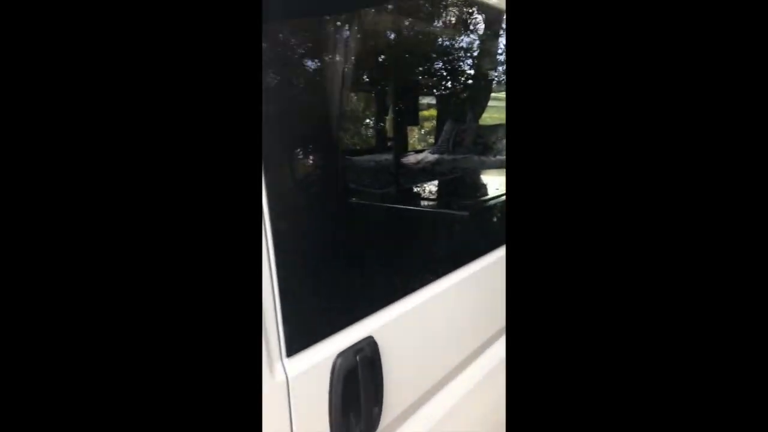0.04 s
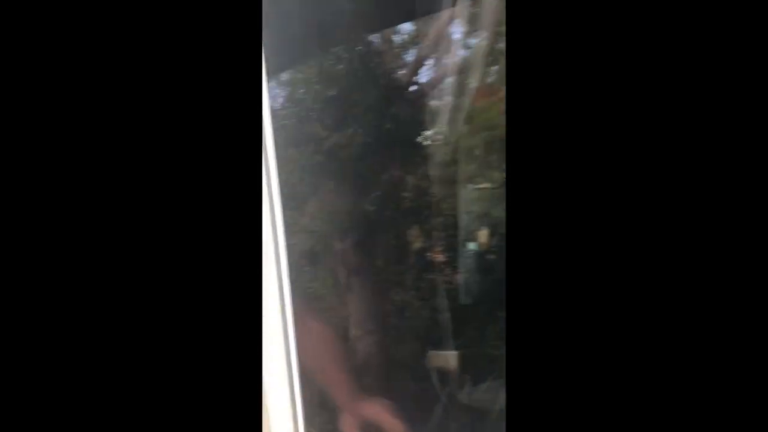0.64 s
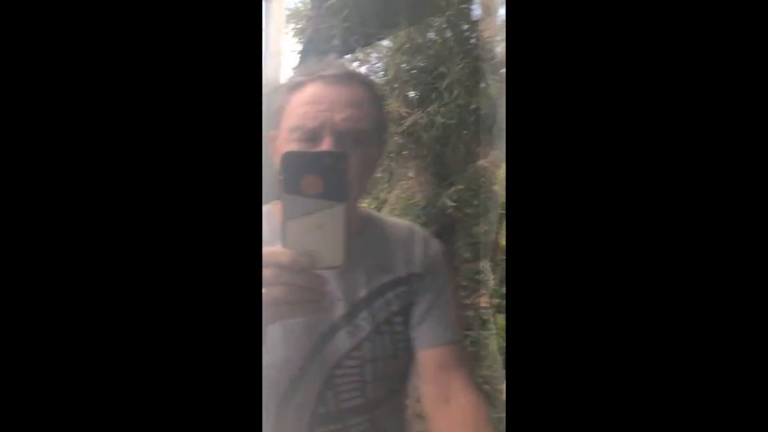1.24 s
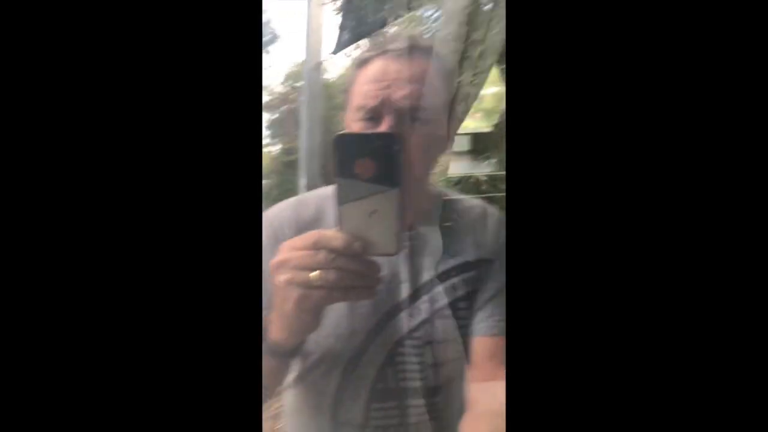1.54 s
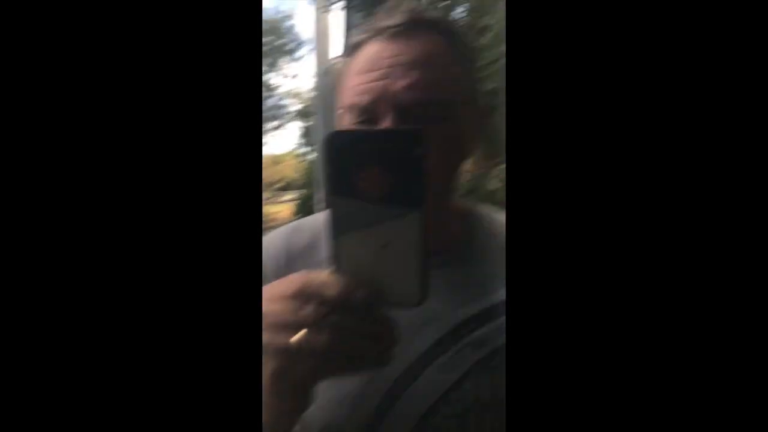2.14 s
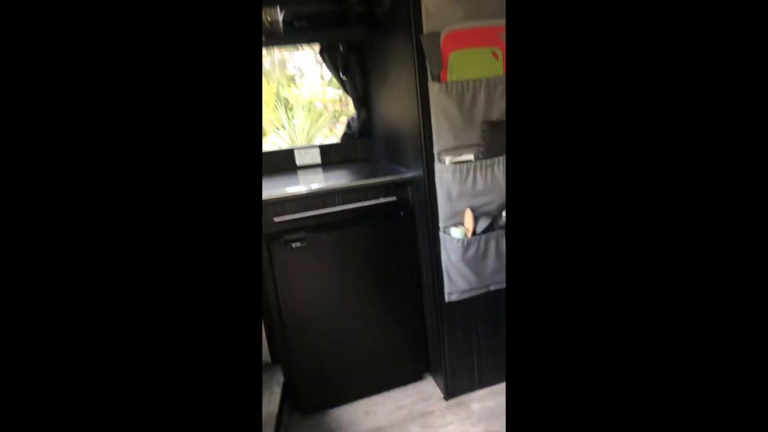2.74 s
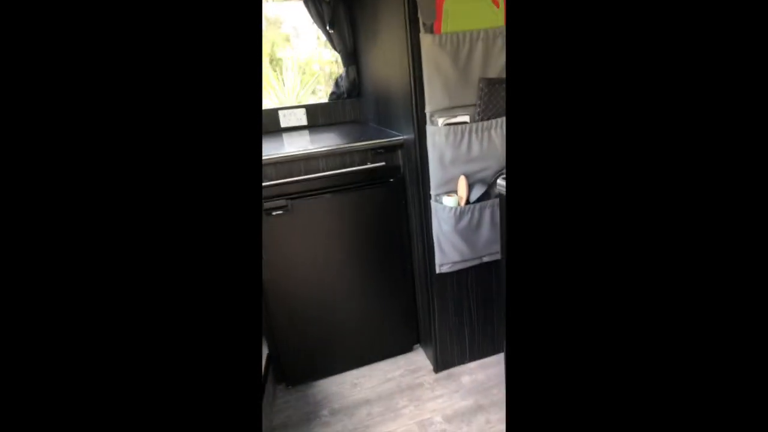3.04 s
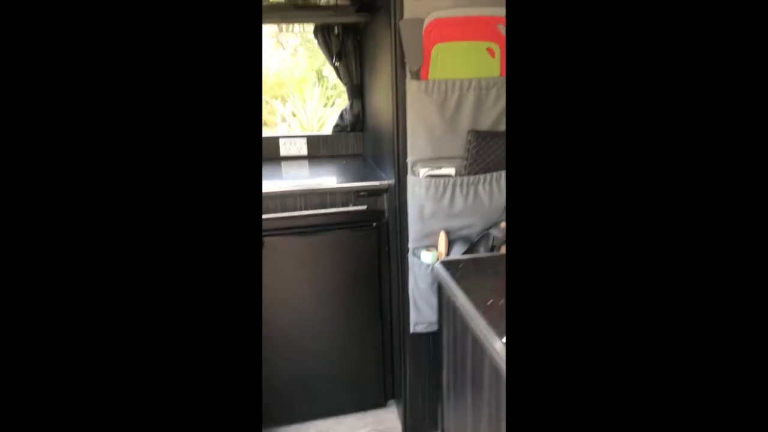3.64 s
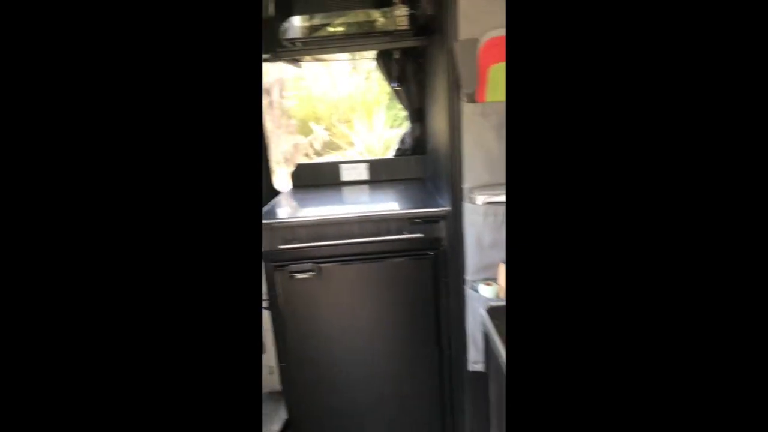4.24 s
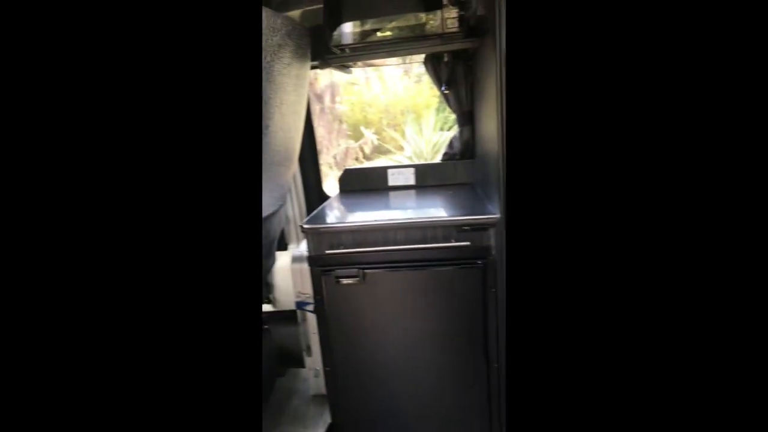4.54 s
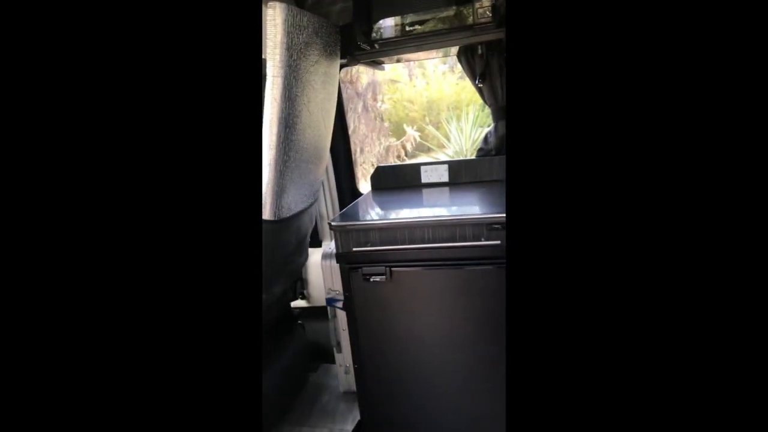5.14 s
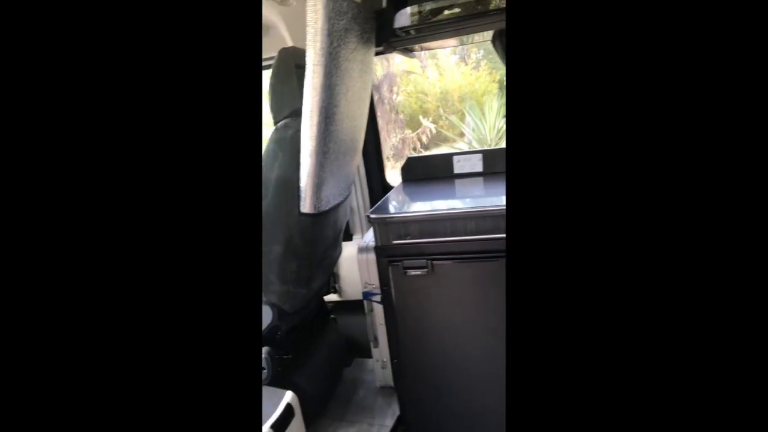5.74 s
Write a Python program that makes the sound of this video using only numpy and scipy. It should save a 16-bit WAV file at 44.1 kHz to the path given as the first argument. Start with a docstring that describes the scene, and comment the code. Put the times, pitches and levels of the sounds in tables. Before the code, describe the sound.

Heard close up on a phone outdoors, a sleeve swishes and a van's handle scrapes and clicks before the side door pops free with a deep metal thud. After a short creak it rolls open, humming and crackling over grit, with one knock along the way. It stops with a clunk and a thin steel ring, followed by a soft footstep. Faint birds and a light breeze lie behind.

```python
"""A van's sliding side door is opened from outside, an arm's length from a phone.
First, clothes rustle and far birds call in quiet outdoor air. A hand pulls the handle, the latch lets
go and the door's outer skin booms (1.6 s). The door creaks out of its frame, rumbles along its rail
and knocks over a joint (3.6 s). It clunks into the end catch (4.9 s), whose steel rings on.
Last, a foot lands on the hollow step (5.6 s)."""
import sys
import numpy as np
from scipy import signal
from scipy.fft import rfft, irfft
from scipy.io import wavfile
from scipy.ndimage import uniform_filter1d

SR = 44100
rng = np.random.default_rng(int(sys.argv[2]) if len(sys.argv) > 2 else 0)


def store_pcm(level_fs):
    """Save levels as 16-bit WAV."""
    pcm = np.round(np.clip(level_fs, -1, 1) * 32767).astype(np.int16)
    wavfile.write(sys.argv[1], SR, np.atleast_2d(pcm).T)


N = 264858
TIME = np.arange(N) / SR
RING_TIME = TIME[:SR]  # one second for each hit to die away
SLAM_S = 4.905  # the door hits the end catch

# The roller arm sticks and slips as the door swings out, then snaps over chips on the rail.
# Each row: start in seconds, level in dB.
ARM_JOLTS = [(1.9068, -16), (1.931, -21), (1.951, -21), (1.968, -25), (1.989, -22.5), (2.0153, -21.5),
             (2.0368, -22), (2.0602, -24), (2.078, -26), (2.091, -28), (2.111, -30), (2.128, -27),
             (2.586, -32), (2.6034, -22.5), (2.821, -24.5)]
# The door gets two shoves, then coasts. Each row: time in seconds, share of top speed.
DOOR_SPEED = [(1.848, 0.14), (2.0, 0.16), (2.2, 0.49), (2.4, 0.4), (2.56, 0.72), (2.85, 0.74), (3.13, 1),
              (3.45, 0.46), (3.97, 0.39), (4.12, 0.14), (4.9, 0.19)]
# The broad tone of rolling on the rail. Each row: frequency in Hz, relative level in dB.
RAIL_TONE = [(30, -11), (60, -5), (95, -3), (140, 3), (250, -4.5), (500, -8), (750, -13), (1000, -11),
             (1500, -19), (2100, -26.5), (3700, -34.5), (5000, -38.5), (9000, -47), (16000, -30.5)]
# How loud the grit is: dB at top speed, dB per tenfold speed, dB per second as the door moves away.
GRIT_LOUDNESS = (-28.5, 21.4, -5)


def door_blows():
    """Metal meets metal at the latch, rail joint and end stop: each crack rings the steel shell."""
    # Each row: start in seconds, then thud, knock, clack and tick (low to high) in dB,
    # then ring time in seconds.
    hits = [(1.6084, -17, -20.5, -26, -51, 0.045), (1.6189, -18, -15, -22.5, -36.5, 0.13),
            (1.624, -10, -8, -41, -46, 0.042), (1.632, -12.5, -19, -28.5, -38, 0.25),
            (1.644, -31, -45, -43, -24.5, 0.05), (3.579, -60, -21, -38, -45, 0.35),
            (3.586, -8.5, -22, -34.5, -29.5, 0.1), (4.7421, -38, -20.5, -31.5, -46.5, 0.22),
            (4.789, -24, -16, -27, -48, 0.069), (4.797, -46, -17, -34, -56, 0.18),
            (4.9017, -22.5, -9.5, -17.5, -21, 0.24), (4.959, -31, -23, -26.5, -38, 0.19),
            (4.970, -11.5, -8, -54, -60, 0.092)]
    # The notes of the door's shell. Each row: pitch in Hz, relative level in dB, ring time in seconds.
    shell_notes = [(390, -7, .3), (539, 3, .24), (575, -4, .35), (675, -1, .2), (895, 1, .17),
                   (951, 2, .18), (1204, -9, .27), (1614, -9, .25), (1758, -6, .22), (1850, -6, .2),
                   (2453, -6, .23), (3435, -9, .17), (3767, -12, .15), (3853, -12, .15), (5617, -12, .11)]
    out = np.zeros(N)
    for start, thud, knock, clack, tick, ring_s in hits:
        tone = [(60, thud - 9), (180, thud - 1), (500, knock - 4), (2000, clack),
                (8000, tick + 0.5), (16000, tick - 6)]
        add(out, start, burst(tone, ring_s, damping=0.22, rise_cycles=1))
        crack = unit(band(noise(SR), 5500, 10000)) * fade(0.018)
        add(out, start, undb(tick + 2) * crack)
        # The seal shortens the ringing until the door is out of its frame.
        ring_share = 0.16 if start < ARM_JOLTS[0][0] else 1
        # A harder hit brings out the higher notes.
        notes = [(hz, db + np.interp(hz, [700, 3000], [knock, clack + 9]), note_s * ring_share)
                 for hz, db, note_s in shell_notes]
        add(out, start, undb(-15.5) * ring(notes, scatter_db=1.5))
    return out


def joint_ping():
    """The end of the rail pings as the rollers cross the joint."""
    # The rail's notes. Each row: pitch in Hz, relative level in dB, ring time in seconds.
    rail_notes = [(2090, -3, .15), (6385, -14, .2), (6520, -13, .17), (7450, 0, .07)]
    out = np.zeros(N)
    add(out, 3.586, undb(-35) * ring(rail_notes, scatter_db=.5))
    return out


def end_catch():
    """The striker, a steel part, hits the catch: it rings loud and short, the catch soft and long."""
    # The notes of both parts. Each row: pitch in Hz, relative level in dB, ring time in seconds.
    striker_notes = [(3290, -5, .07), (3521, -5, .11), (3682, -3, .09), (3790, -4, .08), (4050, -7, .06),
                     (5380, -4, .07), (6011, -7, .08), (6438, -7, .09)]
    catch_notes = [(3133, -3, 1.3), (3327, -5, 1.1), (3424, -7, 1.), (3628, 3, .8), (4285, -11, .9),
                   (4409, -14, .9), (5184, -11, .7), (5469, -1, .58), (5766, -9, .55), (7445, -8, .4)]
    out = np.zeros(N)
    add(out, SLAM_S, undb(-15.5) * ring(striker_notes, scatter_db=.5))
    add(out, SLAM_S, undb(-42.5) * ring(catch_notes, scatter_db=.5))
    return out


def skin_boom():
    """The door's big outer skin heaves slowly and booms; dents in the rail give it shorter thuds."""
    # The skin's deep notes. Each row: pitch in Hz, relative level in dB, ring time in seconds.
    skin_notes = [(55, 0, 0.27), (77, -2, .2), (93, 2, 0.18), (150, -6, 0.15), (188, -5, .18)]
    # The door springs off its seal, rebounds, and later hits the stop.
    # Each row: start in seconds, level in dB.
    heaves = [(1.633, -8.5), (1.6956, -14.5), (1.732, -20), (4.916, -26)]
    # Rollers drop into the deepest dents. Each row: start in seconds, relative level in dB.
    dents = [(2.154, -21), (2.227, -22), (2.309, -20), (3.151, -21), (3.765, -24), (3.789, -23),
             (3.884, -21)]
    dent_notes = [(130.3, 1.5, 0.14), (172, -3, 0.3), (214, -6, 0.27)]  # rows as in skin_notes
    out = np.zeros(N)
    for start, db in heaves:
        add(out, start, undb(db) * ring(skin_notes, random_sign=False))
    for start, db in dents:
        add(out, start, undb(db + 3) * ring(dent_notes, random_sign=False))
    return band(out, 43.4, 610)


def soft_knocks():
    """Hand, handle and feet make padded knocks: a brief note, a short clatter and a low thud."""
    # Each row: start in seconds, relative knock level in dB, pitch in Hz, thud level in dB,
    # ring time in seconds.
    touches = [(1.247, -30.5, 824, -24.5, 0.21), (1.4, -23.5, 730, -50, 0.17),
               (5.048, -32.5, 386, -35, 0.99), (5.179, -36, 700, -31, 0.24),
               (5.417, -39.5, 1090, -36.5, 0.44), (5.461, -29.5, 558, -37, 0.32),
               (5.474, -30.5, 418, -56, 0.33)]
    out = np.zeros(N)
    for start, knock, hz, thud, ring_s in touches:
        push = (1 - np.exp(-RING_TIME * hz)) * fade(min(ring_s / 2, 20 / hz))
        add(out, start, undb(knock + 7.5) * push * np.sin(2 * np.pi * hz * RING_TIME))
        clatter_tone = [(hz / 8, knock - 28), (hz / 2, knock - 11), (hz, knock),
                        (hz * 2, knock - 14), (hz * 16, knock - 52)]
        add(out, start, undb(-4) * burst(clatter_tone, ring_s, damping=.15, rise_cycles=1))
        thud_tone = [(60, thud - 2), (170, thud), (500, thud - 22), (2000, thud - 70)]
        add(out, start, burst(thud_tone, ring_s, damping=0.048, rise_cycles=0.99))
    return out


def small_clicks():
    """Linkage, grit and loose fittings snap sharply; the sound scatters faintly off the van's side."""
    # Each row: start in seconds, relative treble and body levels in dB, ring time in seconds.
    snaps = [(0.239, -32, -44, 0.1), (0.295, -37.5, -40, 0.28), (0.996, -33, -33.5, 0.064),
             (1.457, -20.5, -25, 0.027), (1.773, -32, -39, 0.033), (1.875, -29, -36, 0.04),
             (1.9067, -21.5, -13, 0.042), (2.218, -42, -29, 0.17), (2.6034, -23, -17.5, 0.028),
             (2.82, -24, -16.5, 0.025), (2.867, -25, -21.5, 0.15), (3.902, -26, -31, 0.2),
             (3.736, -40, -37.5, 0.24), (4.069, -44, -35.5, 0.067), (5.266, -39.5, -43, 0.13),
             (5.361, -38.5, -38.5, .12), (5.426, -58, -34.5, .09), (5.829, -41, -42, 0.43)]
    sharp_start = undb(-12.5) + undb(-11) * fade(0.0035)
    out = np.zeros(N)
    for start, treble, body, ring_s in snaps:
        tone = [(250, body - 25), (1500, body - 3), (4000, body - 2),
                (8000, treble - 3), (16000, treble - 9)]
        add(out, start, burst(tone, ring_s, damping=0.15, rise_cycles=0.09) * sharp_start)
    return out


def arm_creak():
    """Each jolt of the roller arm is a dry ping with a faint scatter; a quick run of them creaks."""
    # The arm's notes. Each row: pitch in Hz, relative level in dB, ring time in seconds.
    arm_notes = [(1262, 0, .03), (1370, -3, .019), (1520, -7, .012), (2380, -11, .012), (2750, -14, .011),
                 (3410, -20, .013), (3950, -19, .012)]
    scatter_tone = [(700, -15), (1400, 0), (3800, -7), (8000, -26)]
    onset = 1 - fade(.002)
    out = np.zeros(N)
    for start, db in ARM_JOLTS:
        scatter = unit(colour(noise(SR), scatter_tone)) * fade(.06)
        ping = ring(arm_notes, random_sign=False)
        add(out, start, undb(db) * (ping + undb(-18) * scatter) * onset)
    return band(out, 800, 5500)


def rolling():
    """Rollers run over the gritty rail and shake the door: bright and lumpy when fast, smooth when slow."""
    # Pitches at which the door hums. Each row: pitch in Hz, width in Hz, boost in dB.
    hum_peaks = [(211, 19, 10), (311, 110, 4.5), (586, 140, 11.5), (804, 17, 7)]
    # The outer skin's low rumble, strongest as the door swings out close by.
    # Each row: time in seconds, level in dB.
    skin_levels = [(1.7, -29.5), (2.05, -36.5), (2.18, -22.5), (2.66, -38.5), (4.9, -40)]
    shaking = colour(noise(), RAIL_TONE, hum_peaks)
    speed = door_speed()
    rumble = steady(band(shaking, 122.3, 363)) * undb(2 * speed * drift(22.11))
    hum = steady(band(band(shaking, 367, 877), 367, 877)) * undb(1.05 * speed * drift(25.94))
    hiss = unit(band(shaking, 987, 10000)) * undb(1.2 * speed * drift(30) + 1.8 * drift(400))
    skin_db = np.interp(TIME, *np.transpose(skin_levels), left=-np.inf, right=-np.inf)
    return (rumble * rolling_gain(top_db=-21, speed_db=12.9, away_db=-2.38)
            + hum * rolling_gain(top_db=-27.5, speed_db=19.4, away_db=0)
            + hiss * rolling_gain(*GRIT_LOUDNESS)
            + steady(band(shaking, 48, 115)) * undb(skin_db))


def rail_scrape():
    """At top speed a roller scrapes the side of the rail."""
    rasp = band(colour(noise(), RAIL_TONE), 1000, 3200) * undb(4 * drift(350))
    return undb(-37) * unit(rasp) * hump(peak_s=3.12, spread_s=.11)


def sand_cracks():
    """Grains of sand crack under the rollers at random, more often the faster the door moves."""
    grains_per_s = 60 * door_speed()
    cracks = (rng.random(N) < grains_per_s / SR) * noise()
    snap = band(noise(SR), 1300, 4200) * fade(.03)
    return undb(-4) * rolling_gain(*GRIT_LOUDNESS) * signal.fftconvolve(cracks, snap)[:N]


def singing_panels():
    """The hollow door sings: each wavering note swells as the rollers pass one stretch of rail."""
    # Each row: pitch in Hz, width in Hz, level in dB, loudest moment in seconds, spread in seconds.
    panel_notes = [(193, 14, -29.5, 2.85, .5), (546, 12, -31, 2.58, .2), (576, 12, -30, 2.58, .14),
                   (582, 28, -30.5, 3.1, .18), (783, 16, -36, 2.65, .25), (815, 16, -37, 2.68, .35),
                   (1205, 60, -43, 2.62, .22), (650, 40, -46, 4.3, .45)]
    out = 0
    for hz, width, db, peak_s, spread_s in panel_notes:
        pitch = hz * (1 + .004 * drift(5))
        phase = 2 * np.pi * np.cumsum(pitch) / SR
        note = drift(2 * width) * np.sin(phase) + drift(2 * width) * np.cos(phase)
        out = out + undb(db) * unit(note) * hump(peak_s, spread_s)
    return out


def footstep():
    """A soft sole presses the hollow step: one round thump that dies away in the floor."""
    land_s = 5.617
    press = hump(land_s, spread_s=.007)
    add(press, land_s, undb(-11.5) * fade(0.39))
    return undb(-23.5) * press * steady(band(noise(), 170, 540), size=600)


def handle_pull():
    """The handle scrapes as the hand works it against the door seal."""
    tone = [(30, 4), (150, 11.5), (600, 0), (1500, -11), (4000, -19), (15000, -31)]
    scrape = unit(colour(noise(), tone)) * undb(1.8 * drift(90))
    return undb(-36.5) * scrape * swell(1.3, length_s=0.31, rise_s=0.18, fall_s=0.016)


def sleeve_swish():
    """A sleeve sweeps forward, ever louder, until the hand lands on the handle."""
    # The sliding cloth's faint squeak. Each row: pitch in Hz, width in Hz, boost in dB.
    squeak = [(3570, 110, 8)]
    tone = [(300, -14), (1500, -2), (3500, 2), (8500, 3.5), (16000, -6)]
    land_s, rise_s, hold_s, fall_s = 1.255, 0.23, 0.036, 0.015
    rising = (TIME - land_s + hold_s) / rise_s
    falling = (land_s - TIME) / fall_s
    reach = np.exp(np.minimum(rising, falling).clip(max=0))
    return undb(-45) * reach * unit(colour(noise(), tone, squeak)) * undb(1.5 * drift(110))


def clothes_rustle():
    """Cloth brushes and hisses as the body moves, and still stirs faintly in between."""
    # The tone of the cloth. Each row: frequency in Hz, relative level in dB.
    cloth_tone = [(700, -19), (1800, -5.5), (3500, -2), (5000, -1.5), (8000, -9), (16000, -8.5)]
    # Brushing moves. Each row: start in seconds, length in seconds, level in dB.
    moves = [(0.212, 0.34, -60.5), (1.444, 0.39, -54), (1.844, 0.088, -43), (2.558, 0.23, -47.5),
             (3.018, 0.39, -58), (3.897, 0.07, -55), (5.946, 0.17, -50)]
    cloth = unit(colour(noise(), cloth_tone)) * undb(1.5 * drift(120))
    strokes = sum(undb(db) * swell(start, length, rise_s=0.023, fall_s=0.16)
                  for start, length, db in moves)
    return (undb(-64.5) + strokes) * cloth


def air_puffs():
    """The moving arm pushes soft, very low puffs of air against the microphone."""
    # Each row: start in seconds, length in seconds, level in dB.
    puffs = [(0.27, 0.17, -40.5), (1.136, 0.12, -38)]
    gusts = sum(undb(db) * swell(start, length, rise_s=0.044, fall_s=0.044)
                for start, length, db in puffs)
    return gusts * unit(band(noise(), 30, 70))


def far_birds():
    """Thin, far calls, smeared by the trees into narrow bands of noise."""
    # Each row: start in seconds, length in seconds, pitch in Hz, width in Hz, level in dB.
    calls = [(.09, .05, 5600, 1300, -57), (.6, .13, 3900, 260, -64), (1.77, .04, 2560, 200, -57),
             (5.125, .08, 2750, 300, -57)]
    out = 0
    for start, length, hz, width, db in calls:
        call = unit(band(noise(), hz - width / 2, hz + width / 2))
        out = out + undb(db) * call * swell(start, length, rise_s=0.0034, fall_s=0.0034)
    return out


def outdoor_air():
    """Quiet open air: a light breeze stirs the bass, while the distant hiss stays nearly even."""
    # The tone of the air. Each row: frequency in Hz, relative level in dB.
    air_tone = [(18, -42), (28, -4.5), (55, 3.5), (76, -4.5), (180, -13), (363, -14), (545, -18.5),
                (936, -19.5), (1190, -22), (3820, -36.5), (16000, -51.5)]
    air = unit(colour(noise(), air_tone))
    bass = band(air, 6.4, 124) * undb(1.2 * drift(8))
    middle = band(air, 159, 2360) * undb(1.5 + .6 * drift(6))
    leaves = band(air, 1820, 23000) * undb(2.5 + .4 * drift(4))
    return undb(-44) * (bass + middle + leaves)


def door_speed():
    """The door's share of its top speed at every sample."""
    return np.interp(TIME, *np.transpose(DOOR_SPEED))


def rolling_gain(top_db, speed_db, away_db):
    """Rolling lasts until the slam; it changes by speed_db per tenfold speed and away_db per second."""
    start, edge_s = DOOR_SPEED[0][0], 0.0045
    moving = swell(start, SLAM_S + edge_s - start, edge_s, edge_s)
    return moving * undb(top_db + speed_db * np.log10(door_speed()) + away_db * (TIME - start))


def ring(notes, scatter_db=1, random_sign=True):
    """The fading notes of a struck part; chance stands in for how the spot hit changes each one."""
    out = 0
    for hz, db, ring_s in notes:
        size = undb(db + scatter_db * rng.standard_normal())
        sign = rng.choice([-1, 1]) if random_sign else 1
        out = out + size * sign * fade(ring_s) * np.sin(2 * np.pi * hz * RING_TIME)
    return out


def burst(tone, ring_s, damping, rise_cycles):
    """Countless panel notes blur into noise, octave by octave: lows build slowly, highs die first."""
    hz, db = np.transpose(tone)
    out = 0
    for centre in 1000 * 2. ** np.arange(-4, 5):
        rise = 1 - np.exp(-RING_TIME * centre / rise_cycles)
        shape = rise * fade(ring_s * (centre / 1000) ** -damping)
        octave = band(noise(SR + SR // 8), centre / np.sqrt(2), centre * np.sqrt(2))[-SR:]
        gain = undb(np.interp(np.log(centre), np.log(hz), db))
        out = out + gain * unit(octave * shape) * np.sqrt(np.mean(shape ** 2))
    return out


def fade(ring_s):
    """Die away by 60 dB over the ring time."""
    return np.exp(-np.log(1000) * RING_TIME / max(ring_s, 1e-3))


def swell(start, length_s, rise_s, fall_s):
    """Rise, hold and fall, all within the length."""
    return np.clip(np.minimum((TIME - start) / rise_s, (start + length_s - TIME) / fall_s), 0, 1)


def hump(peak_s, spread_s):
    """A bell-shaped rise and fall."""
    return np.exp(-((TIME - peak_s) / spread_s) ** 2)


def noise(samples=N):
    """Plain white hiss."""
    return rng.standard_normal(samples)


def drift(rate):
    """A smooth random wobble of size about 1, with `rate` new values a second."""
    step = max(int(SR / rate), 1)
    stairs = np.repeat(noise(N // step + 1), step)
    return unit(uniform_filter1d(stairs, step)[:N])


def colour(x, tone, peaks=()):
    """Filter by a broad tone of (Hz, dB) points, with narrow peaks or dips on top."""
    freqs = np.fft.rfftfreq(len(x), 1 / SR) + 1e-3
    hz, db = np.transpose(tone)
    gain_db = np.interp(np.log(freqs), np.log(hz), db)
    for centre, width, boost in peaks:
        gain_db = gain_db + boost / (1 + (2 * (freqs - centre) / width) ** 2)
    return irfft(rfft(x) * undb(gain_db), len(x))


def band(x, low_hz, high_hz):
    """Keep the sound between two frequencies."""
    edges = [low_hz, min(high_hz, SR * .48)]
    return signal.sosfilt(signal.butter(3, edges, "band", fs=SR, output="sos"), x)


def steady(x, size=3500):
    """Even out the slow swells of a noise, leaving an average level of 1."""
    return x / np.sqrt(uniform_filter1d(x ** 2, size) + 1e-18)


def unit(x):
    """Scale to an average (rms) level of 1."""
    return x / np.sqrt(np.mean(x ** 2) + 1e-18)


def undb(db):
    """Turn decibels into a multiplier."""
    return 10 ** (np.asarray(db) / 20)


def add(out, start, x):
    """Mix x in at `start` seconds."""
    i = max(int(start * SR), 0)
    out[i:i + len(x)] += x[:N - i]


def auto_volume(x, above_db=-19, share=.85, attack_s=.028, release_s=.33, block=220):
    """The phone turns itself down just after loud blows and recovers slowly."""
    power = uniform_filter1d(x ** 2, block)[::block]
    level_db = 10 * np.log10(np.maximum(power, 1e-12))
    cut_db = [0]
    for wanted_db in share * np.maximum(level_db - above_db, 0):
        lag_s = attack_s if wanted_db > cut_db[-1] else release_s
        cut_db.append(cut_db[-1] + (wanted_db - cut_db[-1]) * block / SR / lag_s)
    return x * undb(-np.interp(np.arange(N), block * np.arange(len(cut_db)), cut_db))


def scene():
    """All the sources together, in one channel."""
    hits = door_blows() + joint_ping() + end_catch() + skin_boom()
    small_sounds = soft_knocks() + small_clicks() + arm_creak() + footstep()
    sliding = rolling() + rail_scrape() + sand_cracks() + singing_panels()
    person = handle_pull() + sleeve_swish() + clothes_rustle() + air_puffs()
    return (hits + small_sounds + sliding + person + far_birds() + outdoor_air())[None]


def record(dry):
    """The phone colours the treble, turns down after blows, clips peaks and cuts the highest sounds."""
    # Dips caused by the microphone's opening. Each row: frequency in Hz, width in Hz, change in dB.
    opening_dips = [(4930, 370, -5.5), (10500, 1100, -6.5)]
    coloured = colour(dry[0], [(20, 0), (16000, 0.009)], opening_dips)
    clipped = np.clip(auto_volume(coloured), -.9, .9)
    top_cut = signal.ellip(10, .2, 80, 15900, fs=SR, output="sos")
    return signal.sosfilt(top_cut, clipped)[None]


dry = scene()
out = record(dry)
store_pcm(out)
```